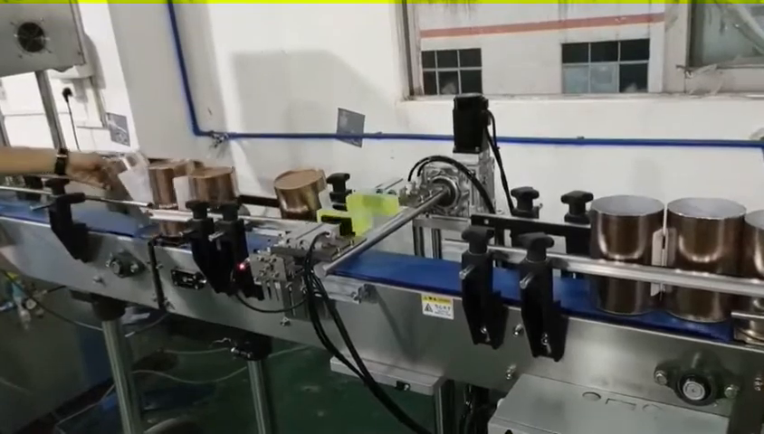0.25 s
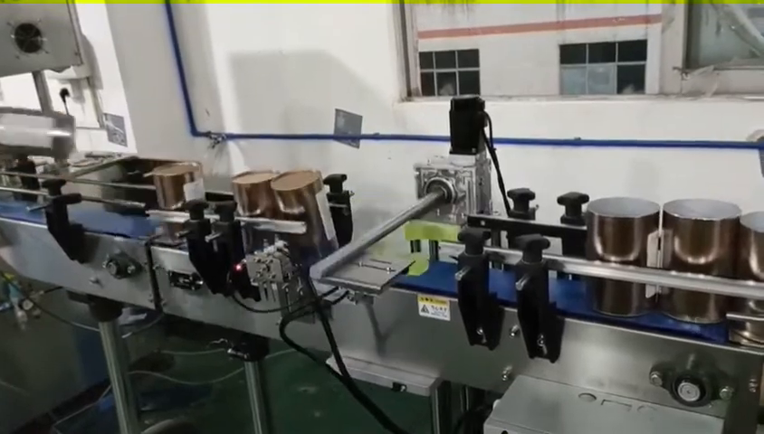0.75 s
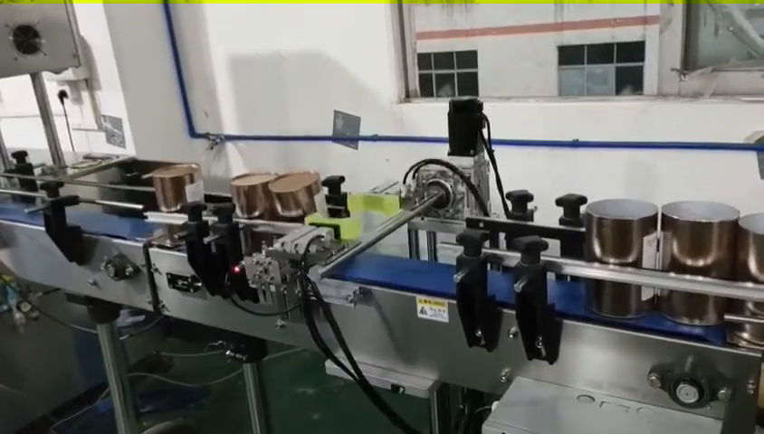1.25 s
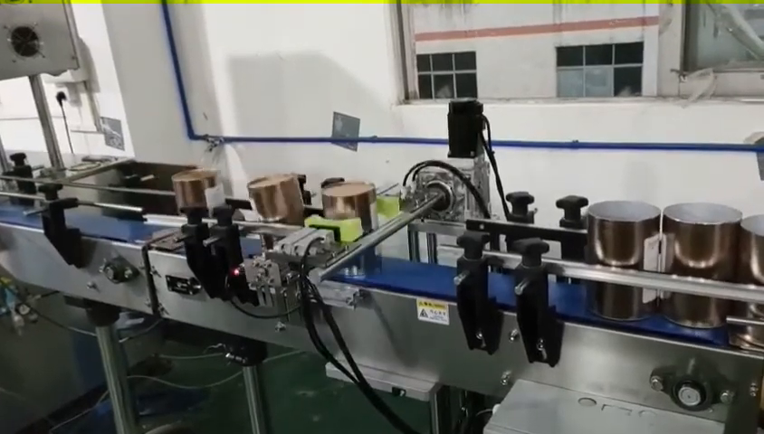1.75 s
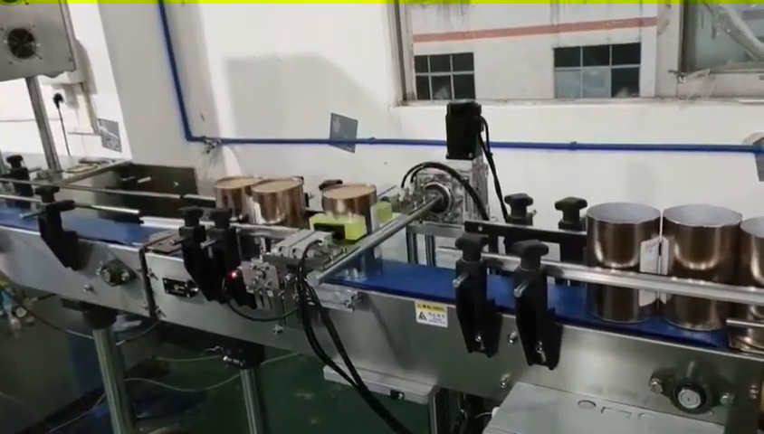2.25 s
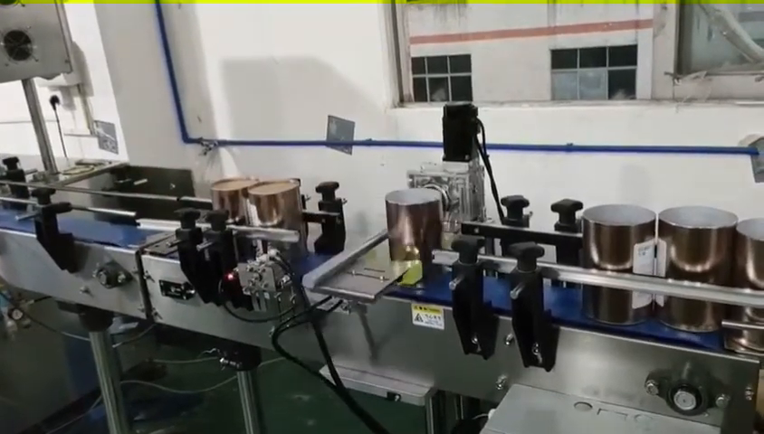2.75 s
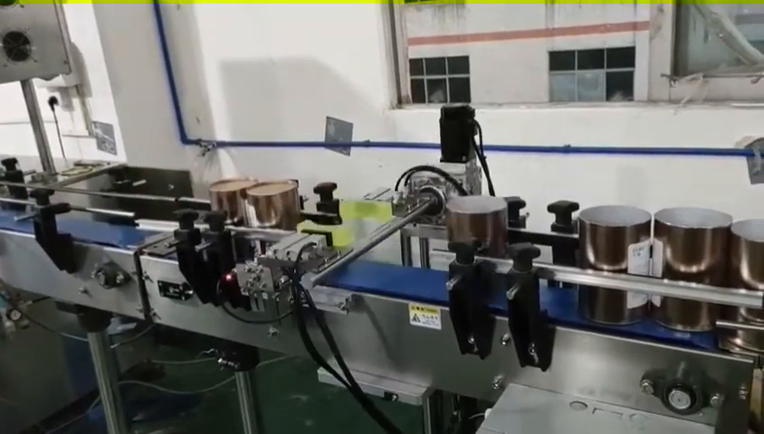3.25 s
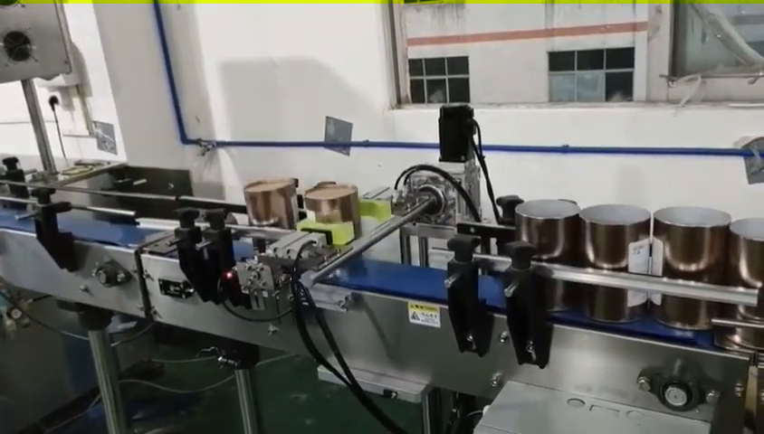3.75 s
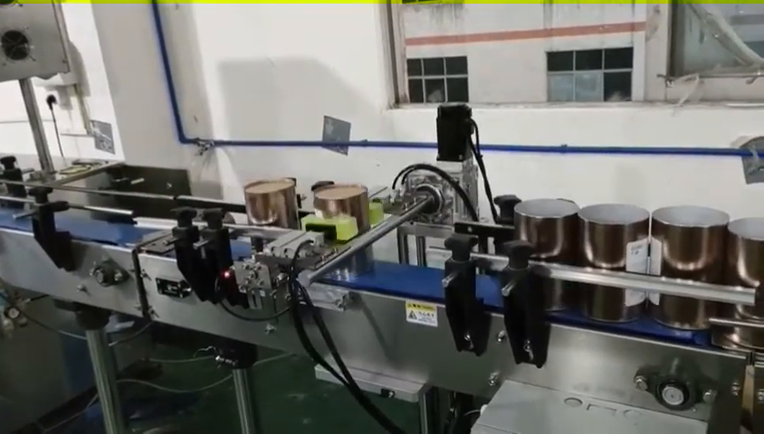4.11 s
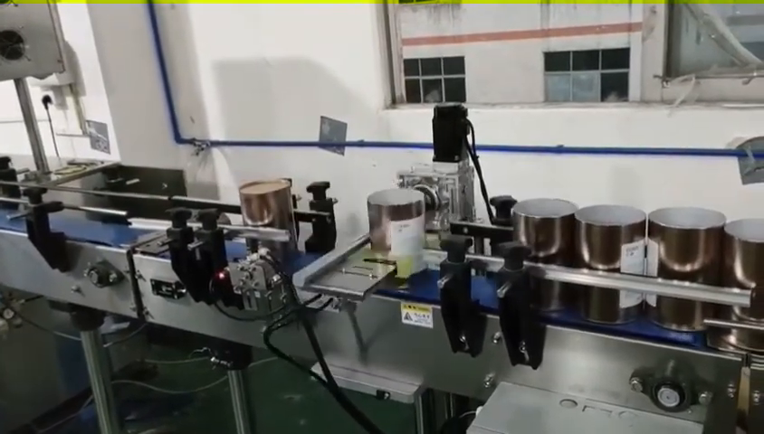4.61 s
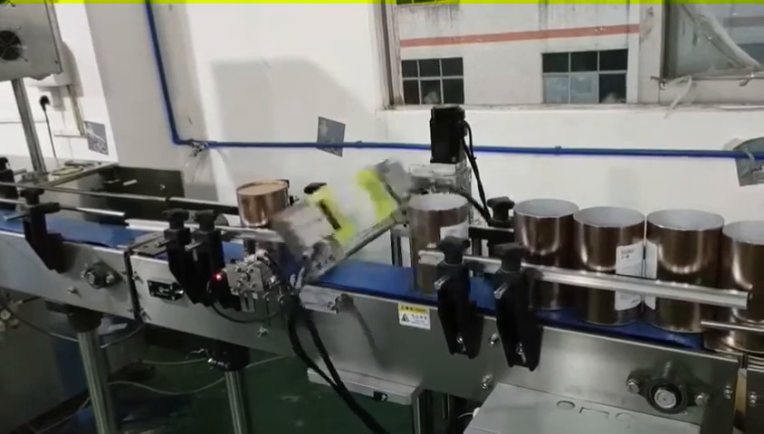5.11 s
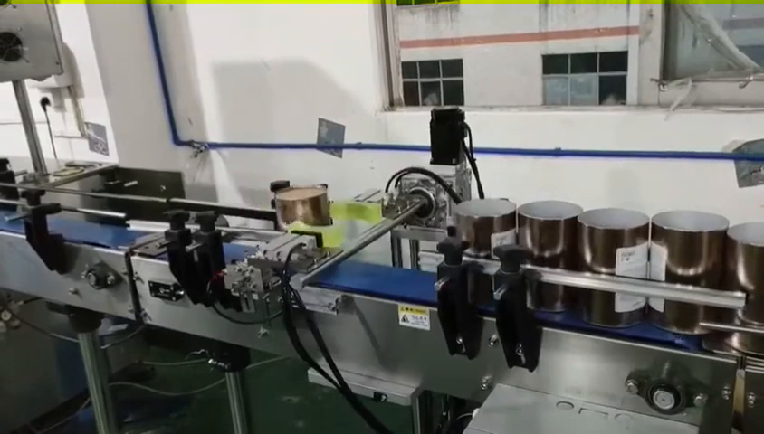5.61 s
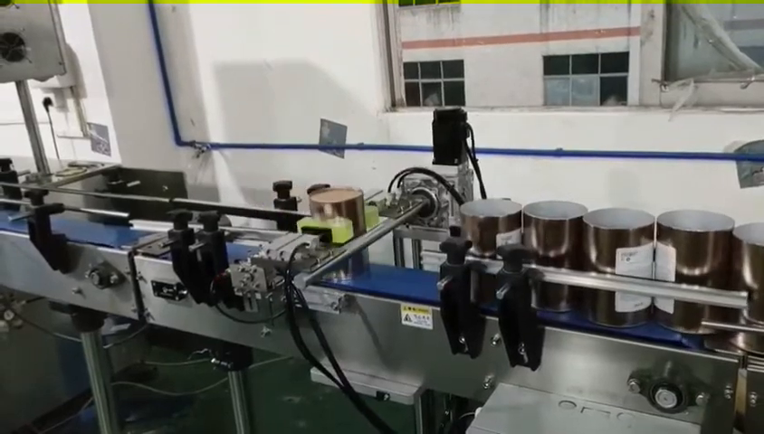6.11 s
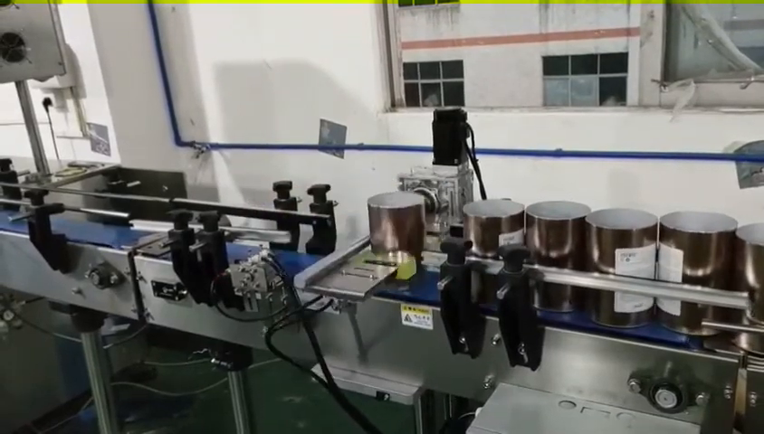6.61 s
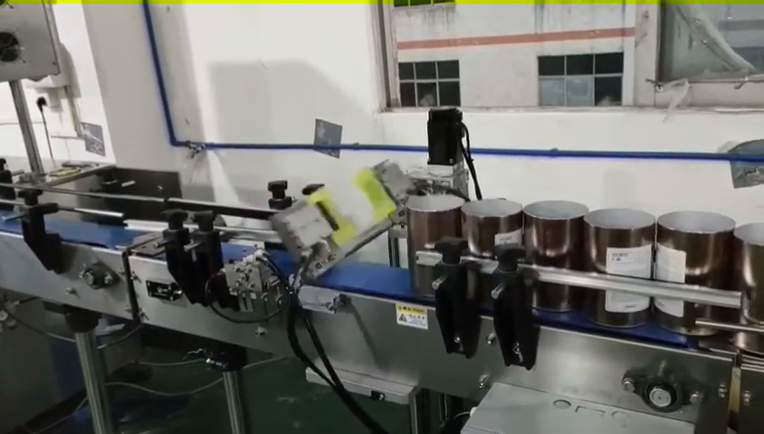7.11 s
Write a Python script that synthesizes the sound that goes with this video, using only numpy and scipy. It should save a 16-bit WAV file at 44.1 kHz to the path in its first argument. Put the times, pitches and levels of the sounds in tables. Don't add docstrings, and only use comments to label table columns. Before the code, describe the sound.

Air valves clack and hiss in a steady rhythm as hollow metal cans knock and land on a droning factory conveyor.

```python
import sys
import numpy as np
from scipy import signal
from scipy.fft import rfft, irfft
from scipy.io import wavfile
from scipy.ndimage import uniform_filter1d

SR = 44100
rng = np.random.default_rng(int(sys.argv[2]) if len(sys.argv) > 2 else 0)


def unload_wav(signal):
    wavfile.write(
        sys.argv[1],
        SR,
        np.round(np.clip(np.atleast_2d(signal).T, -1, 1) * 32767).astype(np.int16),
    )


def rack_gain(trim_db):
    fader = np.asarray(trim_db, float)
    return 10 ** (fader / 20)


N = 324576

# frequency in Hz, level in dB per Hz.
HALL_COLOUR = [(20, -37), (70, -33), (130, -23), (190, -11.5), (340, -8.5), (420, -8.5), (700, -25.5),
               (1150, -19.5), (1650, -26.5), (3000, -21), (5900, -35), (7600, -44.5), (9000, -60),
               (14000, -76)]
# time in seconds, level in dB.
DRIVE_LOAD = [(0, 0), (.6, -3), (1.5, 0.5), (2.5, -1.5), (3.1, -3), (3.6, 0.5), (4.6, -2.5), (5.6, 2.5),
              (6.2, 0.5), (6.9, 1), (7.36, 2)]
# frequency in Hz, width in Hz, level in dB.
FRAME_MODES = [(293.3, 22, -6), (343.2, 27.5, -3.5), (424.8, 25, 3.5), (461.5, 22, -3), (498, 41, -2.5),
               (528, 29, -7.5)]
# start in seconds, length in seconds, level in dB.
WALL_JOLTS = [(0.427, 0.028, -34.5), (0.529, 0.048, -36), (0.863, 0.03, -34), (0.904, 0.027, -38),
              (0.993, 0.056, -33.5), (1.239, 0.036, -35), (1.578, 0.043, -36), (1.722, 0.056, -34.5),
              (2.415, 0.074, -35), (3.51, 0.026, -32), (3.807, 0.092, -30), (4.198, 0.064, -32.5),
              (4.739, 0.043, -30.5), (4.881, 0.03, -37), (5.068, 0.044, -35), (5.18, 0.036, -36),
              (5.516, 0.188, -31), (5.751, 0.046, -44), (5.825, 0.048, -33.5), (6.008, 0.096, -33),
              (6.232, 0.029, -32), (6.432, 0.064, -33.5), (6.733, 0.11, -36), (6.836, 0.046, -41),
              (7.198, 0.164, -34)]
# start in seconds, length in seconds, level in dB.
FRAME_SHAKES = [(0.05, 0.03, -22), (0.188, 0.03, -26), (0.88, 0.052, -25), (1.253, 0.034, -29),
                (2.209, 0.03, -24), (2.746, 0.062, -25.5), (2.899, 0.051, -27), (3.749, 0.03, -30),
                (3.815, 0.086, -27), (4.302, 0.042, -24), (4.586, 0.03, -27), (5.14, 0.041, -23.5),
                (5.298, 0.031, -32), (5.35, 0.038, -28), (5.565, 0.068, -25.5), (5.673, 0.044, -31),
                (6.032, 0.032, -25), (6.439, 0.037, -29), (6.587, 0.13, -26.5), (6.735, 0.096, -27),
                (6.922, 0.066, -25), (7.08, 0.044, -26.5), (7.265, 0.096, -26.5)]
# start in seconds, peak in dB, body ring in Hz,
# wall ring in dB next to the body, rattle in dB.
CAN_HITS = [(0.054, -19.5, 433, -3.5, -22), (0.328, -11, 355, -9, -30), (1.849, -15.5, 478, -13, -26),
            (2.301, -9.5, 368, -11, -21.5), (2.744, -13, 412, -5, -17), (3.818, -14.5, 461, -3, -18),
            (4.298, -7.5, 348, -16, -37), (4.593, -24, 428, -18, -42), (4.746, -28, 325, -17, -18),
            (5.564, -17, 410, -7, -18.5), (6.036, -18, 433, -9.5, -40), (6.293, -6.5, 317, -14, -39),
            (6.743, -11.5, 418, -5, -19.5), (6.776, -18, 437, -19, -15.5), (7.268, -17, 419, -0.5, -19.5),
            (7.29, -16, 477, 0, -28.5)]
# frequency in Hz, level in dB per Hz.
RATTLE_COLOUR = [(300, -11.5), (800, -3.5), (1500, -9.5), (3000, -2), (5000, -12.5), (7000, -16),
                 (9000, -59.5)]
# start in seconds, peak in dB, ring in Hz.
RAIL_PINGS = [
    (0.694, -29.5, 4780),
    (1.2055, -32.5, 5770),
    (1.8487, -22, 6430),
    (3.2046, -32.5, 5700),
    (5.6093, -35, 5670),
    (5.8463, -24, 5500),
]
# start in seconds, peak in dB,
# clack in dB next to the peak, time for the jet to fall 60 dB in seconds.
VALVE_SHOTS = [(0.2518, -12.5, -7, 0.3), (0.8111, -14, -3, 0.26), (1.4205, -12, -10, 0.14),
               (1.7527, -16, 0, 0.34), (2.2233, -13, -10.5, 0.37), (2.814, -12, -7.5, 0.17),
               (3.4221, -13, -11.5, 0.18), (3.7522, -12.5, -2, 0.21), (4.2253, -13, -7, 0.3),
               (4.812, -14.5, -3, 0.27), (5.4216, -13, -31, 0.17), (5.7535, -11, -3.5, 0.14),
               (6.2242, -12.5, -12, 0.25), (6.8145, -13.5, -5, 0.23)]
# jet colour in Hz, thump in dB next to the peak,
# swell of the jet in seconds, lingering vent in dB.
ARM_STROKES = [
    (3700, -15.5, 0.0075, -23.5),
    (3680, -14, 0.011, -15),
    (3700, -21.5, 0.0037, -24),
    (3500, -15.5, 0.0099, -21.5),
]
# frequency in Hz, level in dB per Hz.
JET_COLOUR = [(410, -45.5), (700, -9), (1170, 7), (1830, -5.5), (2940, 3), (3800, 0), (5440, 0),
              (7790, -8.5), (8550, -15.5), (9490, -7.5), (11200, -22.5), (14500, -56), (22000, -120)]
# frequency in Hz, time to fall 60 dB in seconds, level in dB.
CLACK_MODES = [(964, 0.041, 3), (1273, 0.016, -4), (1303, 0.043, 4.5), (1572, 0.054, 6), (1748, 0.12, -1),
               (1873, 0.033, 0), (2710, 0.022, -7)]
# frequency in Hz, level in dB per Hz.
TREBLE_HISS = [(7000, -27), (8500, 1), (10500, -5.5), (12500, -10), (14000, -15), (14300, -56)]

WHINE_HZ, WHINE_WIDTH_HZ, WHINE_DB = 1130, 12.2, -42
ROOM_T60_S, ROOM_DB = 0.81, -11


def level(x):
    return x / np.sqrt(np.mean(x ** 2))


def coloured(points, size):
    hz, db = np.transpose(points)
    bins = np.maximum(np.arange(size // 2 + 1), 1) * SR / size
    gain = rack_gain(np.interp(np.log(bins), np.log(hz), db))
    return level(irfft(rfft(rng.standard_normal(size)) * gain, size))


def resonate(x, hz, width_hz):
    return signal.lfilter(*signal.iirpeak(hz, hz / width_hz, fs=SR), x)


def rumble(size, hz, width_hz):
    return level(resonate(rng.standard_normal(size), hz, width_hz))


def narrow_rumble(hz, width_hz):
    return level(resonate(rumble(N, hz, 2 * width_hz), hz, width_hz))


def low_pass(x, order, hz):
    return signal.sosfilt(signal.butter(order, hz, fs=SR, output="sos"), x)


def high_pass(x, order, hz):
    return signal.sosfilt(signal.butter(order, hz, "high", fs=SR, output="sos"), x)


def walk(rate):
    k = int(SR / rate)
    steps = np.repeat(rng.standard_normal(N // k + 1), k)
    return level(uniform_filter1d(uniform_filter1d(steps, k), k)[:N])


def fade(t, t60):
    return rack_gain(-60 * t / t60)


def ring(t, hz, t60):
    return np.sin(2 * np.pi * hz * t) * fade(t, t60)


def add(out, s, x):
    i = int(s * SR)
    out[i:i + len(x)] += x[:N - i]


def drive_load():
    s, db = np.transpose(DRIVE_LOAD)
    return np.interp(np.arange(N) / SR, s, db)


def hall():
    wash = coloured(HALL_COLOUR, N)
    low = low_pass(wash, 4, 700)
    high = level(high_pass(wash, 4, 700))
    hiss_db = -33.5 + 0.21 * drive_load()
    return rack_gain(-33 + 1.8 * walk(4.12)) * low + rack_gain(hiss_db + 1.13 * walk(13)) * high


def mains_hum():
    return rack_gain(-53.5 + 2.1 * walk(9.6)) * np.sin(2 * np.pi * 100.8 * np.arange(N) / SR)


def belt_drive():
    drone = np.zeros(N)
    for hz, width_hz, db in FRAME_MODES:
        drone += rack_gain(db + 1.9 * walk(2.97)) * narrow_rumble(hz, width_hz)
    return rack_gain(drive_load() - 30 + 2.5 * walk(22)) * level(drone)


def add_swell(out, hz, s, length, db):
    spread = 1.8
    t = np.arange(int(spread * length * SR)) / SR
    wander = level(uniform_filter1d(rumble(SR // 2, 12, 25), size=500))[-len(t):]
    tone = np.sin(2 * np.pi * hz * t + 0.76 * wander)
    start = max(s - (spread - 1) * length / 2, 0)
    add(out, start, rack_gain(db + 2.5 * wander) * np.hanning(len(t)) * tone)


def whine_and_shakes():
    out = rack_gain(WHINE_DB + drive_load()) * narrow_rumble(WHINE_HZ, WHINE_WIDTH_HZ)
    for s, length, db in WALL_JOLTS:
        add_swell(out, WHINE_HZ, s, length, db + 4.5)
    for s, length, db in FRAME_SHAKES:
        add_swell(out, 422, s, length, db + 0.5)
        add_swell(out, 462, s, length, db + 1)
    return out


def rail_pings():
    out, t = np.zeros(N), np.arange(SR // 3) / SR
    for s, db, hz in RAIL_PINGS:
        tone = 0.87 * ring(t, hz, 0.056)
        grit = 0.45 * fade(t, 0.15) * rumble(len(t), hz, 0.056 * hz)
        add(out, s, rack_gain(db - 2) * (1 - np.exp(-t / 0.0013)) * (tone + grit))
    return high_pass(out, 2, 150)


def cans():
    out, t = np.zeros(N), np.arange(SR // 3) / SR
    push = 1 - np.exp(-t / 0.0021)
    wall_hz = 1127.5
    wall = ring(t, wall_hz, 0.043) + 0.45 * ring(t, 1.17 * wall_hz, 0.084)
    wall = push * (wall + 0.48 * ring(t, 0.86 * wall_hz, 0.08))
    for s, db, hz, wall_db, rattle_db in CAN_HITS:
        body = ring(t, hz, 0.087) + 0.49 * ring(t, 0.855 * hz, 0.072)
        body = push * (body + 0.35 * ring(t, 1.2 * hz, 0.06))
        rattle = coloured(RATTLE_COLOUR, len(t)) * (fade(t, 0.43) + 0.5 * fade(t, 0.059))
        add(out, s, rack_gain(db - 0.5) * (body + rack_gain(wall_db) * wall) + rack_gain(rattle_db - 9.5) * rattle)
    return high_pass(out, 2, 150)


def exhaust_jet(t, hz, swell_s, vent_db, t60):
    air = coloured(JET_COLOUR, len(t))
    air = level(air + 0.46 * resonate(air, hz, 0.076 * hz))
    whistles = np.zeros(len(t))
    for whistle_hz in (2290, 2850, 3620, 4560, 5700):
        flicker = rack_gain(5 * rumble(len(t), 20, 30))
        whistles += flicker * resonate(air, whistle_hz, 0.12 * whistle_hz)
    air = level(air + 0.34 * level(whistles))
    air = air - high_pass(air, 4, 7000) * (1 - fade(t, 0.49))
    flutter = rack_gain(1.9 * rumble(len(t), 45, 60))
    rise = np.minimum(t / 0.0013, 1) * (1 - 0.33 * np.exp(-t / swell_s))
    vent = rack_gain(vent_db) * np.exp(-(t / 0.11) ** 4)
    return air * flutter * rise * (fade(t, t60) + vent)


def valve_clack(t):
    clack = np.zeros(len(t))
    for hz, t60, db in CLACK_MODES:
        clack += rack_gain(db) * ring(t, hz * (1 + 0.025 * rng.standard_normal()), t60)
    return high_pass(clack, 2, 500)


def valves():
    out, t = np.zeros(N), np.arange(SR // 2) / SR
    thump = np.minimum(t / 0.011, 1) ** 2 * (ring(t, 145, 0.11) + 0.47 * ring(t, 60, 0.07))
    for k, (s, db, clack_db, t60) in enumerate(VALVE_SHOTS):
        hz, thump_db, swell_s, vent_db = ARM_STROKES[k % len(ARM_STROKES)]
        stroke = rack_gain(-5.5) * exhaust_jet(t, hz, swell_s, vent_db, t60)
        stroke += rack_gain(clack_db - 10) * valve_clack(t)
        stroke += rack_gain(thump_db) * thump
        stroke += rack_gain(-13.5) * fade(t, 0.065) * rumble(len(t), 790, 1.2 * 790)
        add(out, s, rack_gain(db) * stroke)
    return high_pass(out, 2, 55)


def room(x):
    t = np.arange(SR) / SR
    dull = coloured([(60, -3.5), (400, 0.5), (2500, 9), (4000, -3), (12000, -40)], SR)
    bright = coloured([(1500, -19), (4000, 11.5), (7000, 4.5), (12000, -21)], SR)
    tail = dull * fade(t, ROOM_T60_S) + 1.64 * bright * fade(t, 0.64 * ROOM_T60_S)
    tail = tail * (1 - np.exp(-t / 0.011))
    return signal.fftconvolve(x, tail / np.sqrt(np.sum(tail ** 2)))[:N]


def scene():
    background = hall() + mains_hum() + belt_drive() + whine_and_shakes()
    hits = rail_pings() + cans() + valves()
    return (background + hits + rack_gain(ROOM_DB) * room(hits))[None]


def top_cut(x):
    return signal.sosfilt(signal.butter(12, 14100, fs=SR, output="sos"), x)


def record(dry):
    soft = low_pass(np.tanh(1.286 * dry[0]) / 1.268, 4, 10500)
    loudness = level(uniform_filter1d(np.diff(soft, prepend=0) ** 2, size=600))
    hiss = rack_gain(-72 + 2 * walk(18)) * (1 + 2.8 * loudness) * coloured(TREBLE_HISS, N)
    return top_cut((soft + hiss)[None])


dry = scene()
out = record(dry)
unload_wav(out)
```